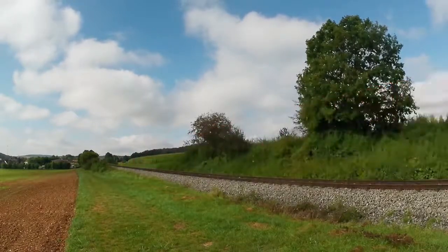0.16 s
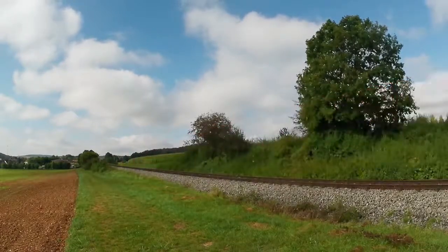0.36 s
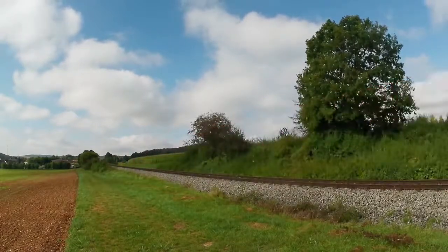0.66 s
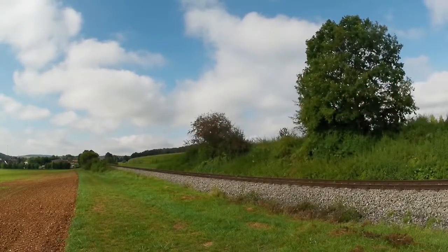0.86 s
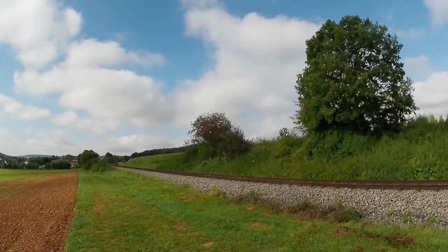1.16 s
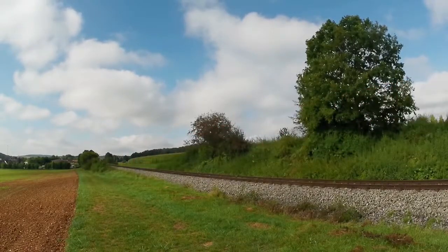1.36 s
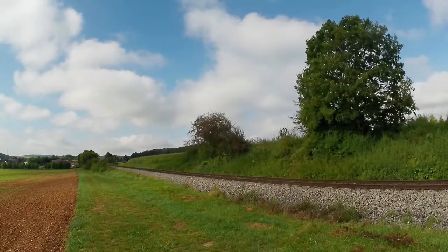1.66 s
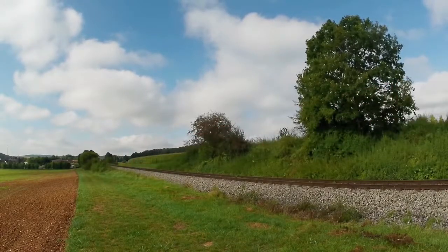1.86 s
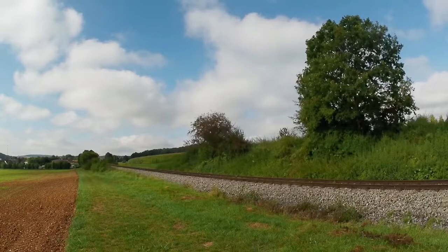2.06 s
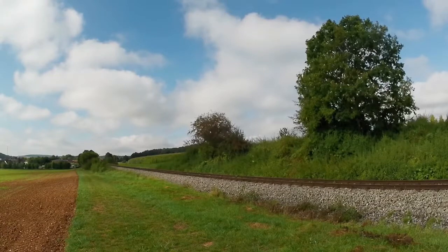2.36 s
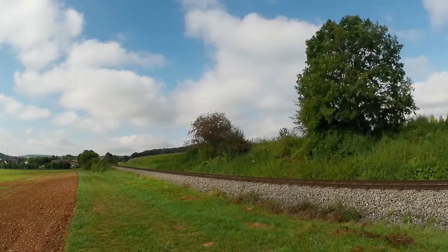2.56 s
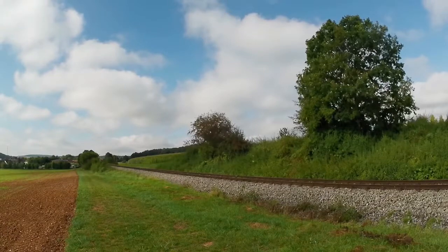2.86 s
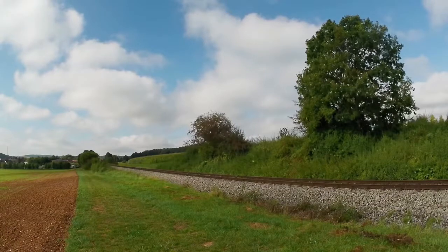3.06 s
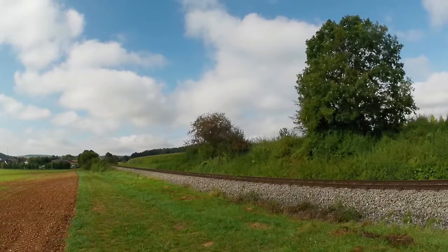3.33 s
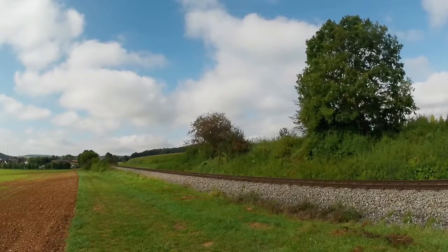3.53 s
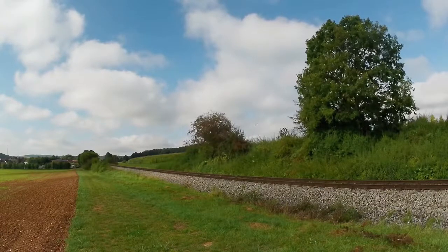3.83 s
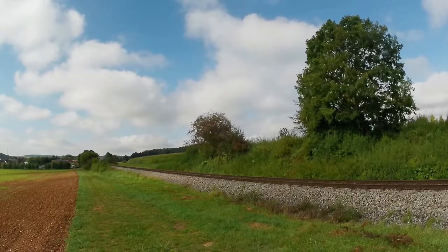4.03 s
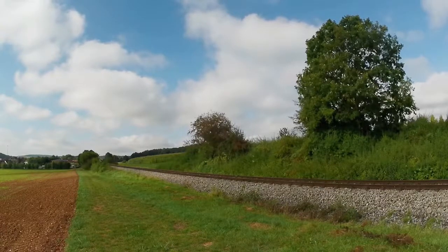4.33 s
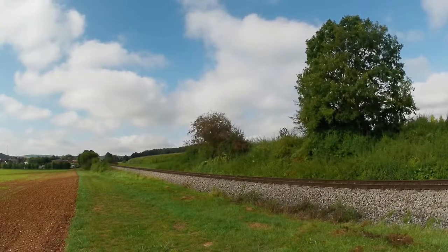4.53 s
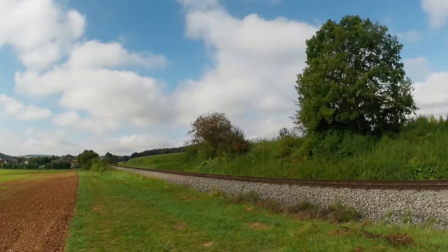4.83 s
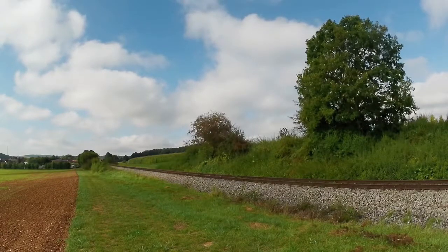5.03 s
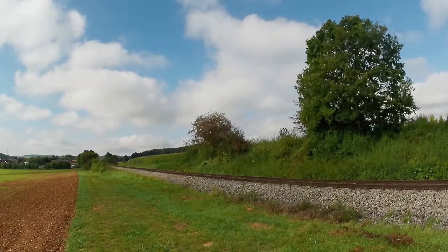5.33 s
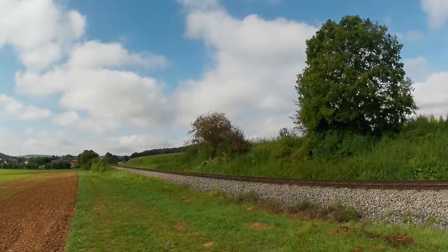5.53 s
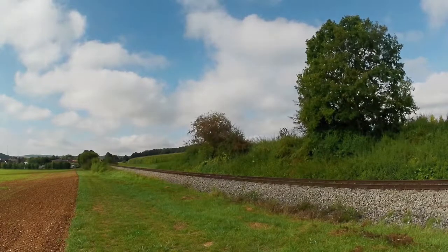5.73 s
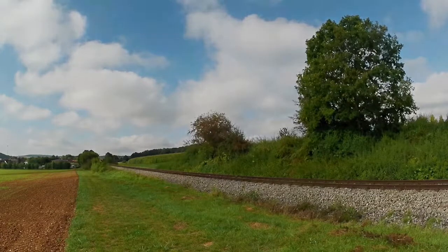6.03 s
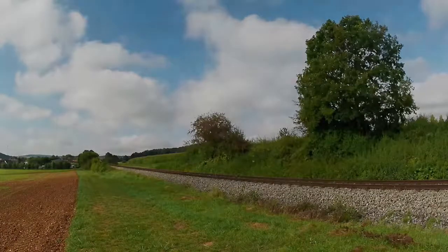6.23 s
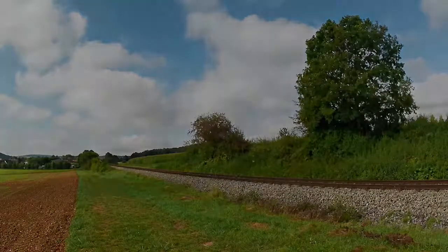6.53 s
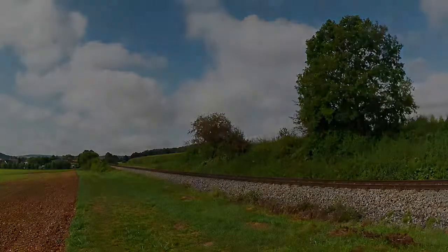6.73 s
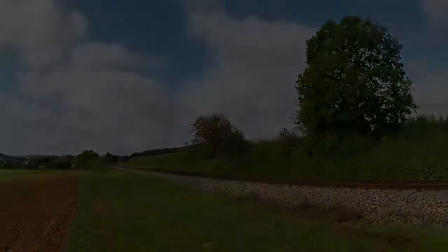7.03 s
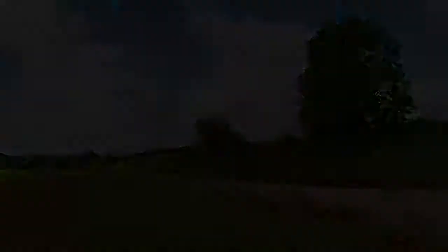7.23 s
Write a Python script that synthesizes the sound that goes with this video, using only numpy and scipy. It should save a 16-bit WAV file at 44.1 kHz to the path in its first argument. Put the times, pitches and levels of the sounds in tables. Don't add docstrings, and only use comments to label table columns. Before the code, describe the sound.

From 0 s a diesel railbus is already leaving after passing close by an outdoor microphone in open farmland. The start is the loudest: a low, steady exhaust drone around 54 Hz with its octave, coarse rolling roar, bright wheel-on-rail hiss, and a quick cluster of dull axle thuds until about 0.6 s, weaker ones to 1.2 s. A tiny grit tick snaps at 0.4 s. After 1 s the hiss darkens and the level falls steadily, with rough little swells in the rolling noise. Four faint metallic knocks come between 2.3 and 2.9 s, while the rail sings hollowly near 840 Hz around 3 s. From 4.5 s the wheels sink behind the bank. The engine coasts from 5.5 s and thins away. By 6-7.4 s mostly low gusty rumble, quiet countryside murmur, a faint distant rail tone and soft microphone hiss remain.

```python
import sys
import numpy as np
from scipy import signal
from scipy.fft import rfft, irfft, next_fast_len
from scipy.io import wavfile

SR = 44100
rng = np.random.default_rng(int(sys.argv[2]) if len(sys.argv) > 2 else 0)


def gain_from_db(level_db):
    decades = np.asarray(level_db, float) / 20
    return 10 ** decades


def int16_out(signal):
    q = np.round(np.clip(np.atleast_2d(signal).T, -1, 1) * 32767)
    wavfile.write(sys.argv[1], SR, q.astype(np.int16))


N = 325899

# (frequency [Hz], density [dB per Hz])
HISS_SPECTRUM = [(2940, -19), (5000, -10), (6070, -7.5), (6850, -4), (7060, -9.5), (13200, -6),
                 (15500, -6.5)]
# (frequency [Hz], density [dB per Hz])
FIELD_SPECTRUM = [(53, -24.5), (90, -1), (298, -17.5), (508, -25.5), (775, -26), (2600, -47), (3380, -64),
                  (5720, -120)]
# (time [s], lift [dB], half length [s])
GUSTS = [
    (3.5, 8.5, 0.17),
    (6.25, 6.5, 0.11),
    (6.7, -15, 0.083),
    (7.05, 8, 0.16),
]
# (frequency [Hz], width [Hz], level [dB])
FAR_RAIL_SONG = [(764, 14, -22), (1693, 250, -18.5)]
# (time [s], peak [dB])
GRIT_TICKS = [
    (.4100, -42),
    (1.88, -62),
]
# (frequency [Hz], density [dB per Hz])
RUMBLE_SPECTRUM = [(10, -9), (20, 6), (40, -0.5), (70, -3), (100, -15.5), (160, -34), (250, -35.5)]
# (frequency [Hz], density [dB per Hz])
BODY_SPECTRUM = [(74, -43), (125, -5), (138, -10.5), (156, -9.5), (269, -18), (340, -33), (440, -39),
                 (750, -120)]
# (frequency [Hz], density [dB per Hz])
CONTACT_SPECTRUM = [(1120, -15.5), (2020, -5), (2200, -1.5), (2510, -4.5), (2950, -4.5), (4460, -11.5),
                    (4940, -10.5), (5680, -13.5), (6850, -19.5), (7060, -22.5), (10000, -27.5),
                    (14300, -48), (22000, -120)]
# (frequency [Hz], density [dB per Hz])
ROLLING_SPECTRUM = [(180, -25), (290, -15.5), (360, -7), (410, -10), (560, -6.5), (840, -5.5), (1230, -5),
                    (1310, -11.5), (1420, -9.5), (1560, -10.5), (1810, -8), (1940, -21.5), (2700, -53),
                    (4600, -120)]
# (frequency [Hz], width [Hz], level [dB])
WHEEL_MODES = [(372.2, 34, -7.5), (586.3, 30, -5), (712, 6.4, -7.5), (762.5, 22, -5), (841, 62, -0.5),
               (960.4, 26, -4), (1223, 62, -1.5), (1567, 73, -5.5), (1740, 19, -16), (2146, 37, -11),
               (2423, 25, -19.5), (3070, 40, -40), (527.7, 11, -15), (698, 7.1, -6)]
# (frequency [Hz], lift [dB], extra loss [dB per dB of spreading])
TRACK_PARTS = [(480, 1.5, 0.47), (840, -1, 0.11), (1720, -3, 0.2159)]
# (time [s], lift [dB])
ROUGH_STRETCHES = [(.04, 1), (.17, 3.5), (.26, 0), (.39, 0.5), (.49, 2), (.666, 4), (.842, 4), (.99, 3.5),
                   (1.15, 4.5), (1.459, 1), (1.769, 2), (1.9, 3.5), (2.38, 2), (2.6, -0.5), (3.3, 1.5),
                   (3.59, 0), (4.3, -3)]
# (time [s], peak [dB], ring [Hz])
JOINT_THUDS = [(0.035, -24, 160), (0.124, -15, 185), (0.216, -14.5, 187), (0.263, -19.5, 175),
               (0.394, -18.5, 230), (0.393, -19, 163), (0.515, -26, 238.3), (0.565, -17.5, 220),
               (0.75, -27, 215), (0.924, -27, 173), (1.083, -26.5, 183), (1.239, -36, 175)]
# (time [s], peak [dB], ring [Hz])
WHEEL_CLANKS = [
    (2.326, -36.5, 817),
    (2.425, -34, 840),
    (2.683, -34.5, 830),
    (2.852, -38, 851),
]
# (time [s], firing rate [Hz])
FIRING_RATE = [(0.0, 53.37), (0.6, 53.3), (0.68, 54.16), (1.2, 54.41), (5.86, 54.7), (5.95, 53.12),
               (6.2, 54.5)]
# (time [s], firing note [dB], octave relative to it [dB])
EXHAUST_LEVELS = [(0.0, -25, -21), (0.16, -19.5, -10.5), (0.57, -25.5, -17), (0.68, -23.5, -5.5),
                  (0.76, -21.5, -5), (1.03, -24, -5.5), (1.4, -22, -7.5), (1.87, -29, -4),
                  (2.3, -23, -11.5), (2.92, -28, -11.5), (3.31, -24, -16.5), (3.56, -30, -12),
                  (4.11, -27, -20), (4.63, -31.5, -15.5), (5.0, -29, -20), (5.4, -35, -19),
                  (5.8, -29.5, -26), (6.0, -38, -27)]
# (multiple of firing rate [1], level [dB])
HALF_ORDERS = [(.5, -9), (1.5, -3.5), (2.5, -19), (3, -14.5)]

TAIL_ON_S = 1.08


def clock():
    return np.arange(N) / SR


def rms_one(x):
    return x / np.sqrt(np.mean(x ** 2) + 1e-20)


def in_time(rows):
    times, *columns = np.transpose(rows)
    return [np.interp(clock(), times, column) for column in columns]


def smooth_step(moment, rise):
    return 0.5 + 0.5 * np.tanh((clock() - moment) / rise)


def bumps(rows):
    t = clock()[::32]
    lift_db = sum(db * np.exp(-((t - s) / half) ** 2) for s, db, half in rows)
    return np.interp(clock(), t, lift_db)


def drift(rate_hz):
    grid = 40
    r = np.exp(-2 * np.pi * rate_hz * grid / SR)
    noise = rng.standard_normal(N // grid + 2002)
    slow = signal.lfilter([1], [1, -2 * r, r * r], noise)[2000:]
    return np.interp(np.arange(N) / grid, np.arange(len(slow)), rms_one(slow))


def coloured(spectrum, flicker_db, rate, count, share=lambda hz: 0):
    hz, level_db = np.transpose(spectrum)
    size = next_fast_len(N, real=True)
    log_hz = np.log(np.maximum(np.fft.rfftfreq(size, 1 / SR), 1))
    shape = gain_from_db(np.interp(log_hz, np.log(hz), level_db, -150, -150))
    shaped = rfft(rng.standard_normal(size)) * shape
    centres = np.linspace(np.log(hz[1]), np.log(hz[-3]), count)
    together = drift(rate)
    bands = [irfft(shaped * np.interp(log_hz, centres, own), size)[:N] for own in np.eye(count)]
    gains = [gain_from_db(flicker_db * (0.5 * together + drift(rate)) + share(np.exp(c))) for c in centres]
    return sum(gain * band for gain, band in zip(gains, bands)) / np.std(sum(bands))


def resonance(x, hz, width):
    r = np.exp(-np.pi * width / SR)
    poles = [1, -2 * r * np.cos(2 * np.pi * hz / SR), r * r]
    return signal.lfilter([(1 - r * r) / 2, 0, (r * r - 1) / 2], poles, x)


def singing(x, hz, width):
    return rms_one(resonance(resonance(x, hz, width), hz, width))


def dying_ring(t, hz, peak_db, t60, rise):
    return gain_from_db(peak_db - 60 * t / t60) * (1 - np.exp(-t / rise)) * np.sin(2 * np.pi * hz * t)


def spreading_db():
    side_m, speed_m_per_s, passed_s = 9.42, 15.15, 0.65
    t = clock()[::32]
    metres = np.hypot(side_m, speed_m_per_s * (t + passed_s))
    return np.interp(clock(), t, 20 * np.log10(metres / metres[0]))


def fader_db():
    return 20 * np.log10(np.maximum(1 - clock() / 11, 0.01))


def away_db(start_db, loss):
    return start_db - loss * spreading_db() + fader_db()


def microphone_hiss():
    level = np.hypot(gain_from_db(-72.5 + fader_db()), gain_from_db(away_db(-66, 1.5)))
    return level * coloured(HISS_SPECTRUM, 0.21, 5.0, count=2)


def field():
    gust_db = bumps(GUSTS)

    def breeze(hz):
        return gust_db * np.clip(1.3 - hz / 400, 0, 1)

    murmur = coloured(FIELD_SPECTRUM, 1.2, 3.9, count=4, share=breeze)
    song = 0
    for hz, width, level_db in FAR_RAIL_SONG:
        song = song + gain_from_db(level_db) * singing(rng.standard_normal(N), hz, width)
    return gain_from_db(-48 + fader_db()) * (murmur + song)


def grit_ticks():
    out, t = np.zeros(N), np.arange(SR // 400) / SR
    parts = ((-0.0012, 10800, 0.0043, -3), (0, 13900, 0.0022, 12), (0.009, 13200, 0.004, -9))
    for s, peak_db in GRIT_TICKS:
        for lag, hz, t60, lag_db in parts:
            i = round((s + lag) * SR)
            out[i:i + len(t)] += dying_ring(t, hz, peak_db + lag_db, t60, 1 / 9000)
    return out


def rumble():
    level_db = away_db(-30.5, 0.19) + 3.2 * drift(4.9)
    return gain_from_db(level_db) * coloured(RUMBLE_SPECTRUM, 1.0, 10.0, count=3)


def body_hum():
    return gain_from_db(away_db(-28, 1.75)) * coloured(BODY_SPECTRUM, 1.3, 5.3, count=4)


def contact_hiss():
    screened_db = 1.5 - 7.5 * smooth_step(TAIL_ON_S, 0.45)
    air_db = 0.39 * spreading_db()
    hedge_db = -1 * smooth_step(5.51, 0.12)

    def presence(hz):
        bank_db = screened_db * np.exp(-(np.log(hz / 3100) / 0.31) ** 2)
        return bank_db - air_db * np.clip(hz / 7000 - 0.9, 0, 0.4) / 0.36

    hiss = coloured(CONTACT_SPECTRUM, 0.93, 9.2, count=10, share=presence)
    return gain_from_db(away_db(-37, 1.433) + hedge_db) * hiss


def knocks(events, lift_db, t60, rise):
    out, t = np.zeros(N), np.arange(SR // 4) / SR
    for s, peak_db, hz in events:
        i = round(s * SR)
        out[i:i + len(t)] += dying_ring(t, hz, peak_db + lift_db, t60, rise)
    return out


def rolling():
    swell_db = bumps([(s, db, 0.019) for s, db in ROUGH_STRETCHES])
    cutting_db = -1.5 * smooth_step(4.45, 0.15)
    rolling_db = away_db(-28.5, 1.43) + swell_db + cutting_db
    lost_db = spreading_db()
    clump_db = 1.7 * (1 - 0.042 * lost_db)
    part_db = [lift - extra * lost_db + clump_db * drift(12.6) for _, lift, extra in TRACK_PARTS]
    centres = np.log(np.array(TRACK_PARTS)[:, 0])

    def share(hz):
        weights = [np.interp(np.log(hz), centres, own) for own in np.eye(3)]
        return sum(weight * db for weight, db in zip(weights, part_db))

    rough = rng.standard_normal(N)
    song_db = bumps([(2.96, 5.4, 1.7)])
    modes = 0
    for hz, width, top_db in WHEEL_MODES:
        level_db = top_db + 0.5 * drift(5.1) + share(hz)
        if abs(hz - 840) < width:
            level_db = level_db + song_db
        modes = modes + gain_from_db(level_db) * singing(rough, hz, width)
    broad = coloured(ROLLING_SPECTRUM, 0.22, 31.0, count=6, share=share)
    return gain_from_db(rolling_db) * (gain_from_db(-0.5) * broad + gain_from_db(-9.0) * modes)


def engine():
    t = clock()
    firing_hz, = in_time(FIRING_RATE)
    first_db, octave_db = in_time(EXHAUST_LEVELS)
    first_db = first_db - 4 * np.maximum(t - 5.5, 0)
    half_db = first_db - 10 - 2.0 * t
    phase = 2 * np.pi * np.cumsum(firing_hz) / SR
    slip = 0.22 * drift(4.0) - 1.6 * (1 - smooth_step(TAIL_ON_S, 0.15))
    out = gain_from_db(first_db + 0.2 * drift(5.8)) * np.cos(phase)
    out = out + gain_from_db(first_db + octave_db + 0.89 * drift(18.0)) * np.cos(2 * phase + slip)
    for multiple, order_db in HALF_ORDERS:
        waver = 0.6 * drift(2.0)
        level = gain_from_db(half_db + order_db + 2.5 * drift(6.1))
        out = out + level * np.cos(multiple * phase + waver)
    return np.sqrt(2) * out


def scene():
    background = field() + grit_ticks() + rumble()
    thuds = knocks(JOINT_THUDS, 10.9, t60=0.038, rise=0.0069)
    clanks = knocks(WHEEL_CLANKS, 0.92, t60=0.05, rise=0.0012)
    car = body_hum() + contact_hiss() + thuds + clanks + rolling() + engine()
    return (background + car)[None]


def low_pass(x):
    return signal.sosfilt(signal.butter(12, 15640, fs=SR, output="sos"), x)


def record(dry):
    ending = np.minimum((N / SR - clock()) / 0.004, 1)
    mix = (dry + microphone_hiss() + 0.0013) * ending
    return low_pass(mix)


dry = scene()
out = record(dry)
int16_out(out)
```